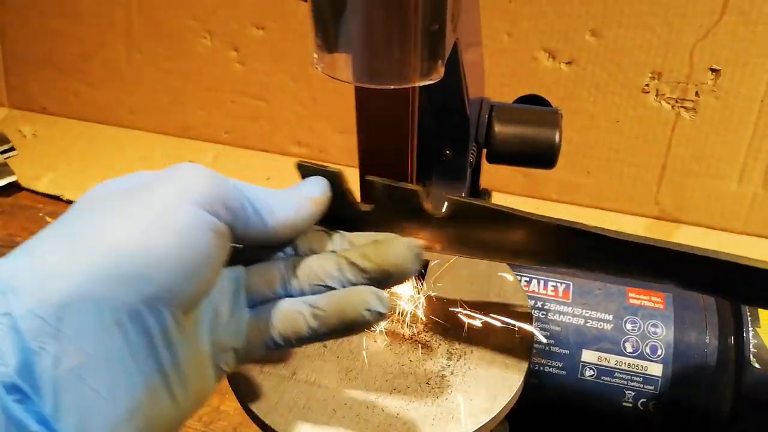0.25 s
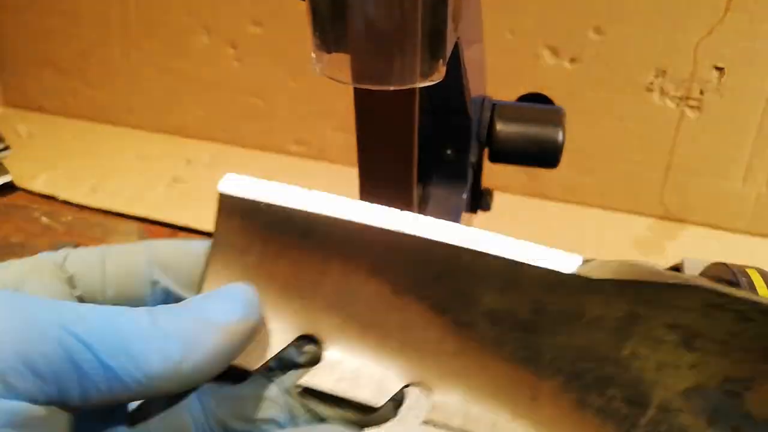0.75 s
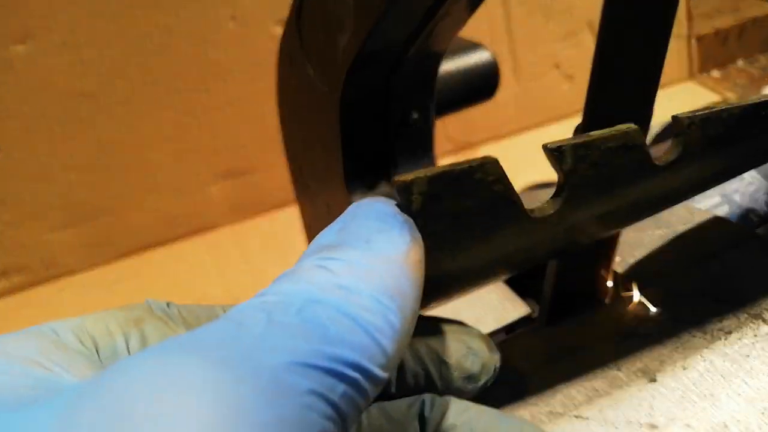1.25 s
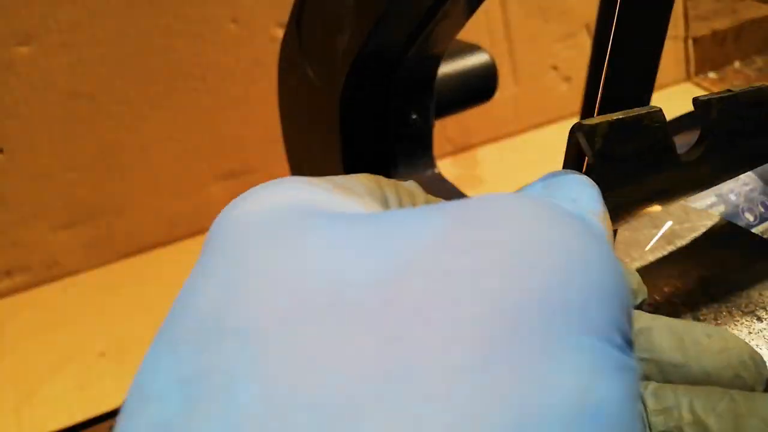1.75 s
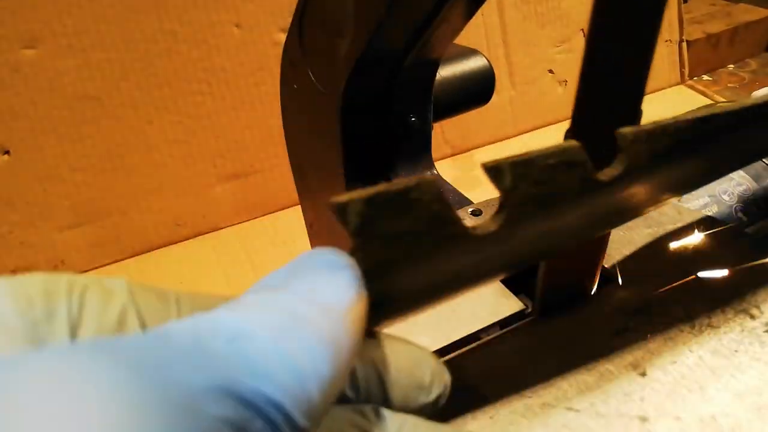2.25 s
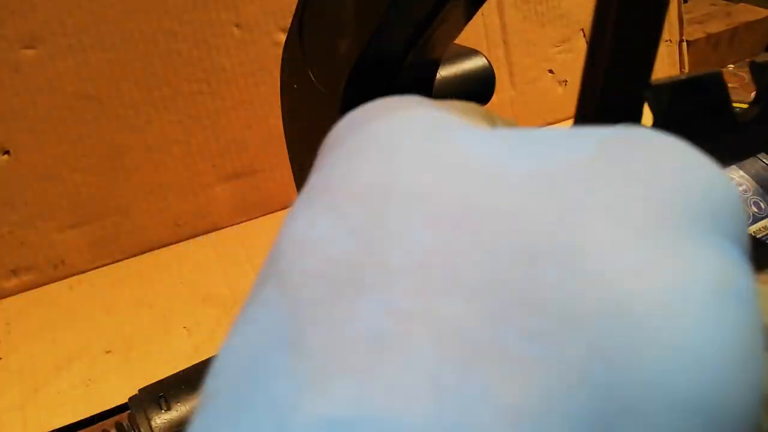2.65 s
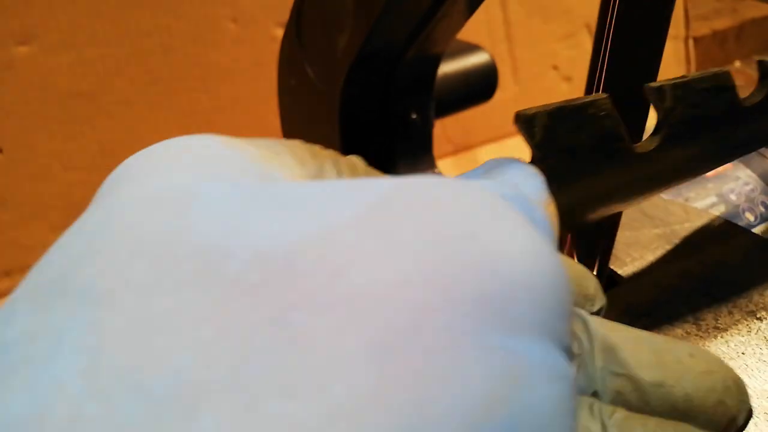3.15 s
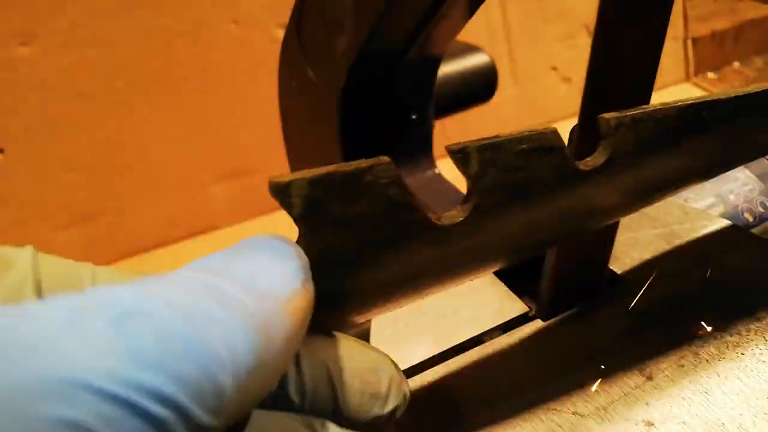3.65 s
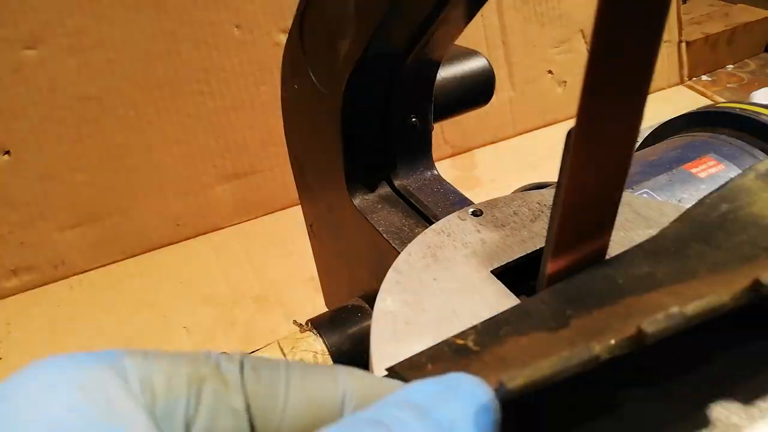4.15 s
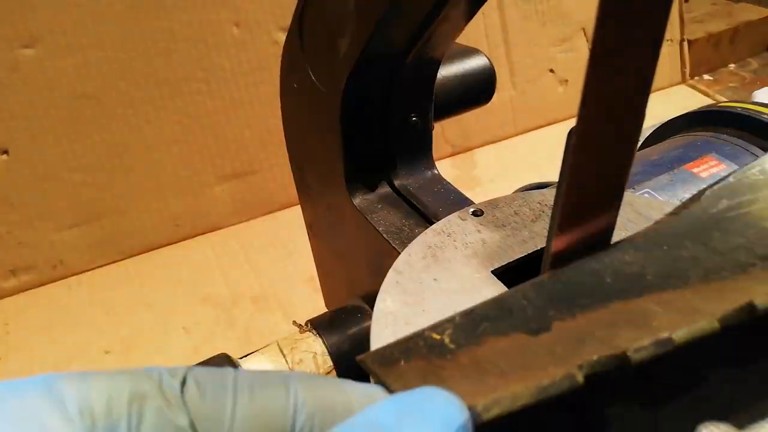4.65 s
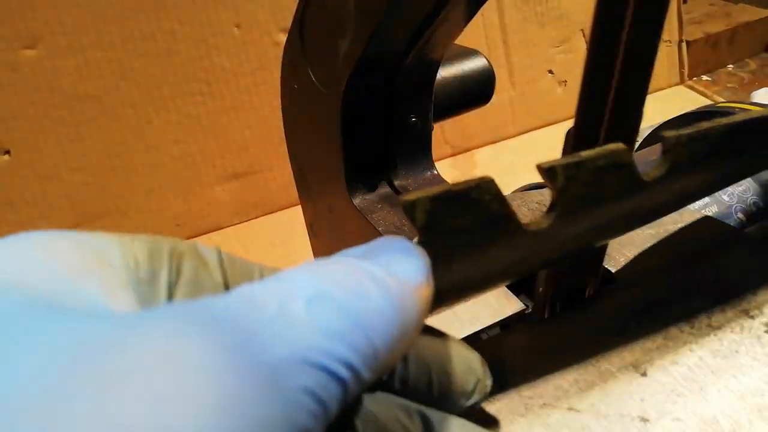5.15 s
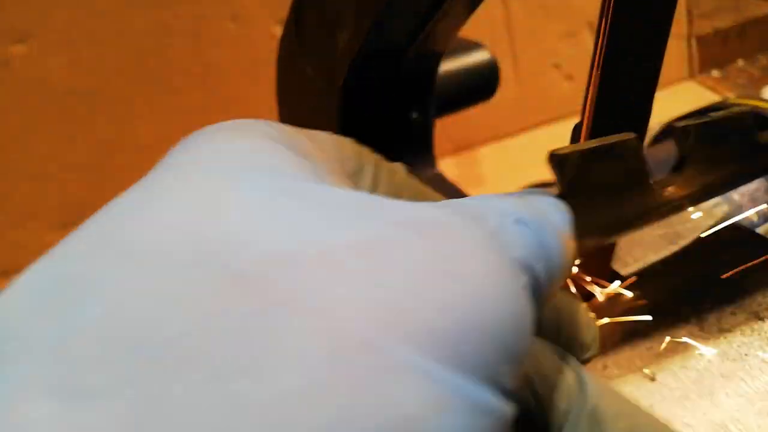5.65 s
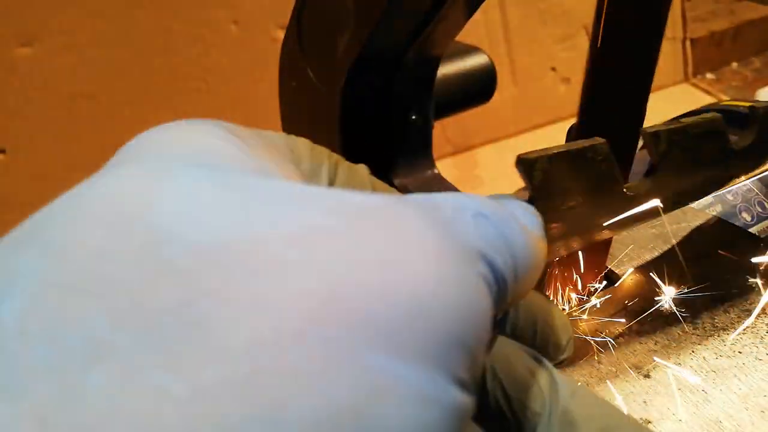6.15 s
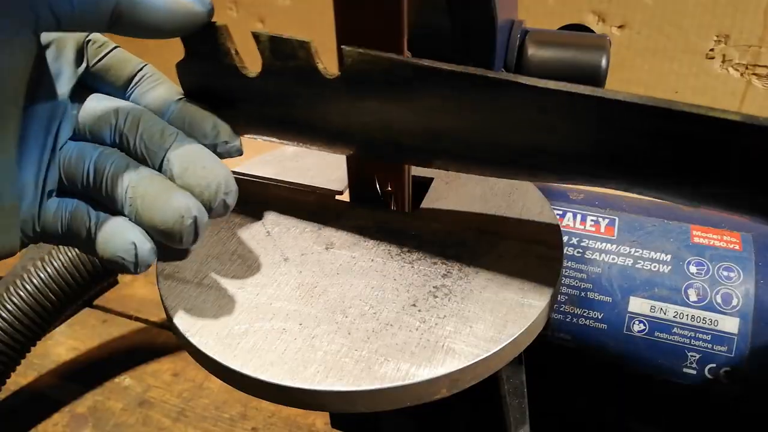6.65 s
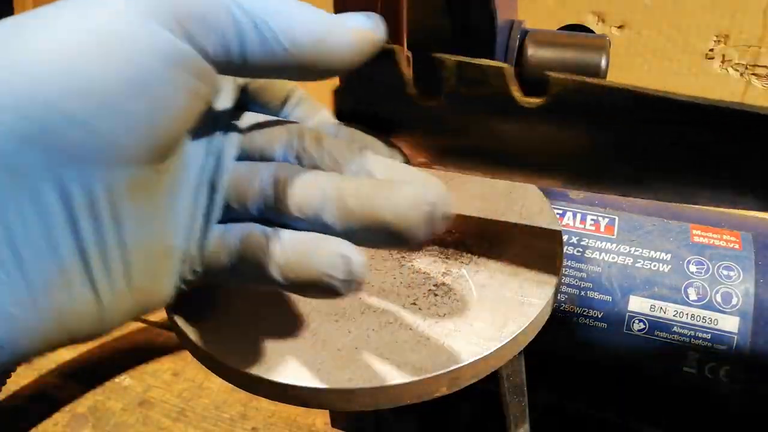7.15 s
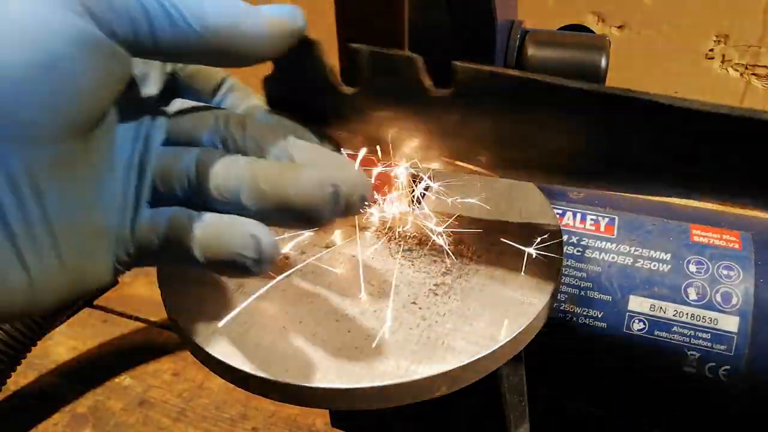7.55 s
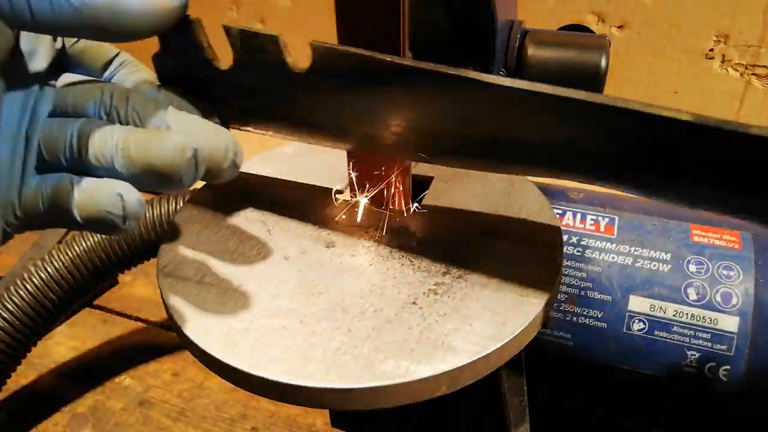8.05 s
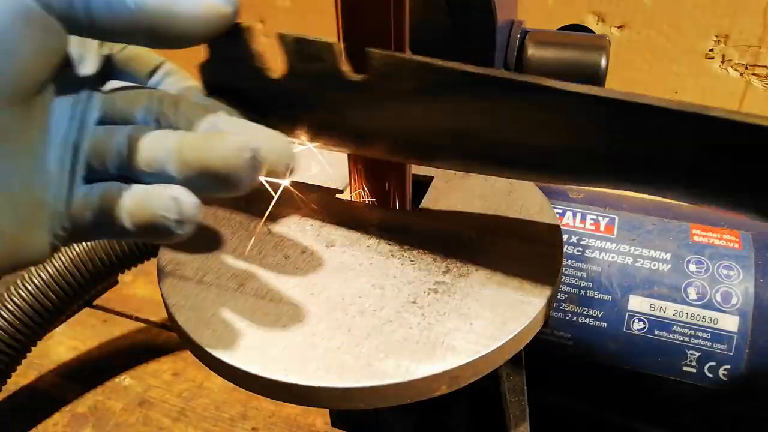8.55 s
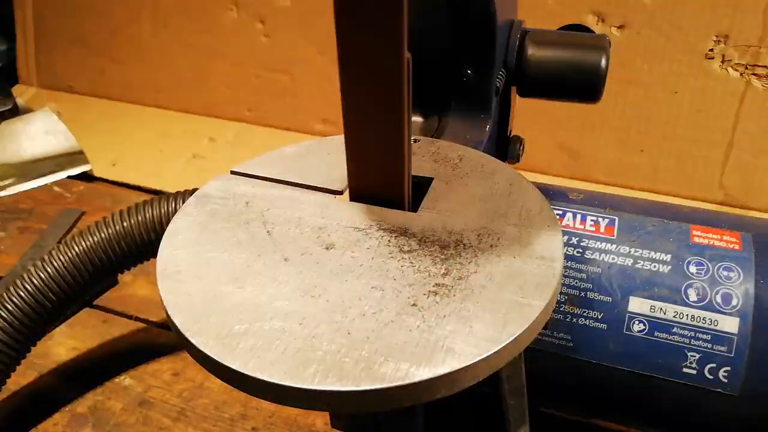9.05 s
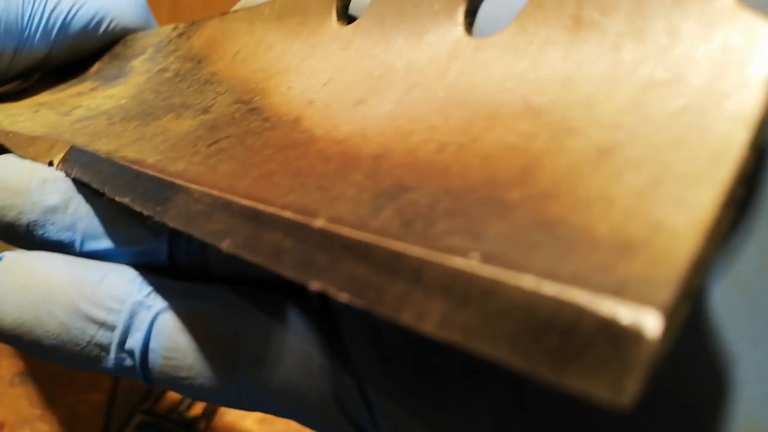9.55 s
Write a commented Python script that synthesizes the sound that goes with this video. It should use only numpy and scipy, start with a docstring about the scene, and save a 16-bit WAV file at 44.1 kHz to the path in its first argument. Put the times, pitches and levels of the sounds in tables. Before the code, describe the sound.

A steel blade scrapes on a running belt sander in harsh, ringing abrasive strokes over a steady motor hum, then everything cuts to quiet.

```python
"""Blade on a belt sander

A steel blade moves to and fro on a narrow belt sander beside a humming dust extractor, heard from front and side.
The grit hisses as shaped noise and drives the blade's ringing modes; both throb some 43 times a second.
Taps, a brief buzz, frame resonances and idle noise surround them; from 9.1 s only the quiet workshop is left.
The recorder's gain control presses the hum down under the grinding."""
import sys
import numpy as np
from scipy import signal
from scipy.io import wavfile
from scipy.ndimage import uniform_filter1d

SR = 44100
rng = np.random.default_rng(int(sys.argv[2]) if len(sys.argv) > 2 else 0)


def inscribe(sig):
    """Save sig as 16-bit PCM at rate SR to the path in sys.argv[1].

    A 1-D sig is mono; a 2-D sig holds one channel per row.
    Samples are clipped to [-1, 1] before scaling.
    """
    pcm = np.round(np.clip(np.atleast_2d(sig).T, -1, 1) * 32767)
    wavfile.write(sys.argv[1], SR, pcm.astype(np.int16))


N = 433062
STEP = 40
COARSE_S = np.arange(N // STEP + 2) * STEP / SR   # slow controls live on every 40th sample
QUIET_FROM_S = 9.112   # the machines stop sounding here
# All levels are those reaching the microphone, before its dip and the recorder's gain control.


def from_db(db):
    """Gain of a level in dB."""
    return 10 ** (np.asarray(db) / 20)


def fine(coarse):
    """A slow control at every sample."""
    return np.interp(np.arange(N) / SR, COARSE_S, coarse)


def at_hz(points, hz):
    """A table of (frequency [Hz], value) read on a log frequency axis."""
    points = np.array(points)
    return np.interp(np.log(hz), np.log(points[:, 0]), points[:, 1])


def drift(rate):
    """Slow chance of spread 1: noise through a double one-pole low-pass at this rate in Hz, run in."""
    r = np.exp(-2 * np.pi * rate * STEP / SR)
    noise = rng.standard_normal(len(COARSE_S) + 2000)
    slow = signal.lfilter([1], [1, -2 * r, r * r], noise)[2000:]
    return slow / slow.std()


def resonate(x, hz, width_hz):
    """Noise of rms 1 through a two-pole resonance comes out with rms about 1."""
    r = np.exp(-np.pi * width_hz / SR)
    gain = np.sqrt((1 - r * r) / 2)
    poles = [1, -2 * r * np.cos(2 * np.pi * hz / SR), r * r]
    return signal.lfilter(gain * np.array([1, 0, -1]), poles, x)


def quarter_ahead(ring, hz):
    """A narrow ring a quarter cycle earlier, from its slope."""
    return np.gradient(ring, axis=-1) / np.sin(2 * np.pi * hz / SR)


# Microphone places in turn: (start [s], seen from the side [0-1], hum [Hz], hum left-right [dB],
# hum left lead [rad], third partial [dB re first], idle noise [dB], full hum shift under grinding [Hz])
PLACES = [(0, 0.01, 331, 0.5, -0.083, -22.5, -1, 3.0), (0.985, 0.53, 329.2, -2.1, -0.64, -36, 0.5, -0.7),
          (6.631, 0.02, 331, -0.05, 0.55, -36, 4.5, 3.0)]
START, SIDE, HUM_HZ, HUM_PAN, HUM_LEAD, THIRD_DB, IDLE_OFFSET, HUM_SHIFT = range(8)


def by_place(column):
    """A column of the microphone places, held until the next place."""
    rows = np.array(PLACES)
    return rows[np.searchsorted(rows[:, START], COARSE_S, "right") - 1, column]


THROB_HZ, IDLE_THROB_DB, GRIND_THROB_DB = 42.996, 2, 1   # mean rate; mean swing either way
TICK_DB, TICK_SHARPNESS = 1.3, 14   # typical extra peak on a crest, and how narrow it is


def throb(depth_db):
    """A quick regular swell in dB, uneven in depth, its crests topped by sharp ticks of chance height."""
    turn = 2 * np.pi * THROB_HZ * COARSE_S + .5 * drift(1.4)
    cycle = np.abs(turn // (2 * np.pi)).astype(int)
    tick_db = TICK_DB * np.minimum(rng.exponential(1, len(turn)), 3)[cycle]
    crest = np.exp(TICK_SHARPNESS * (np.sin(turn) - 1))
    return depth_db * (1 + .4 * drift(8.6)) * np.sin(turn) + tick_db * crest


TOUCH_S, LIFT_S, LIFTED_DB = 0.03, 0.025, -7.5   # landing and leaving time; curve value off the belt
# The blade resting on the belt, one curve for each contact:
# (time [s], grinding pressure [dB over the hum], contact place along the edge [-1 to 2])
CONTACTS = [
    [(0, 15, 0.1), (0.1, 14, 0.05), (0.2, 13, -0.035), (0.29, 17, -0.2), (0.4, 17, 0.05), (0.484, 16, 0.1)],
    [(1.255, 9, -0.052), (1.33, 12, -0.1), (1.63, 16.5, -0.5), (1.9, 12, 1.15), (2.1, 10, -0.054),
     (2.27, 18.5, -0.42), (2.52, 14, -0.42), (2.72, 16.5, 0.82), (3.04, 13.5, -0.75), (3.42, 16.5, 0.43),
     (3.57, 12, -0.56), (3.688, 16.5, -0.52)],
    [(5.14, 10, -0.071), (5.16, 5.5, -0.071), (5.19, 10.5, -0.1), (5.32, 19, -0.16), (5.45, 11, 0.63),
     (5.67, 12, 0.6), (5.86, 18, 0.027), (6.06, 10, -0.46), (6.22, 20, 0.37), (6.37, 18.5, 1.2),
     (6.471, 12.5, 0.84)],
    [(6.655, 14, 0.6), (6.74, 17, 0.11), (6.92, 13, -0.7), (7.2, 12, -0.17), (7.54, 19, -0.0025),
     (7.81, 18, 0.89), (7.9, 13.5, -0.3), (7.98, 18.5, 0.22), (8.07, 15.5, -0.21), (8.25, 20, 0.65),
     (8.34, 15, -1.1), (8.6, 15.5, 0.053), (8.9, 15, -0.1), (8.975, 12, -0.22)],
]


def contact():
    """Pressure (dB) and place: the blade lands, follows its curve and lifts off."""
    rows = []
    for curve in CONTACTS:
        (first_s, _, first_place), (last_s, _, last_place) = curve[0], curve[-1]
        rows.append((first_s - TOUCH_S, LIFTED_DB, first_place))
        rows += curve
        rows.append((last_s + LIFT_S, LIFTED_DB, last_place))
    s, stroke_db, place = np.transpose(rows)
    return np.interp(COARSE_S, s, stroke_db), np.interp(COARSE_S, s, place)


RING_UP_S, RING_LATE_DB, BITE_DB = 0.09, -13, 5.5   # settling time; ringing and grit offsets on landing


def landing():
    """1 as the blade lands, dying away while it settles; the first contact is already settled."""
    land_s = np.array([curve[0][0] - TOUCH_S for curve in CONTACTS[1:]])
    since_s = COARSE_S - land_s[:, None]
    return np.sum((since_s > 0) * np.exp(-np.abs(since_s) / RING_UP_S), axis=0)


# Colour of the grit hiss; only its shape counts: (frequency [Hz], density [dB per Hz])
GRIT_COLOUR = [(300, -45.5), (600, -20.5), (1100, -17.5), (2200, 3), (2600, -7.5), (3400, 1.5),
               (4000, -2.5), (5800, 1.5), (9500, 3.5), (10300, -3), (11300, -6), (11800, -11), (15700, -24)]
GRIT_DB = -5.5   # relative to the grinding pressure


def grit(pressure_db, off_db):
    """Noise layer of the grit scraping steel: it follows the pressure and bites hardest on landing."""
    return GRIT_COLOUR, pressure_db + GRIT_DB + BITE_DB * landing() + off_db, 2.0


BLADE_DB, BLADE_WANDER_DB = -19.5, 2.3   # relative to the pressure; spread of each mode's level
# Pitches of the blade's modes: (frequency [Hz])
MODE_HZ = [1660, 2000, 2210, 2350, 2430, 2960, 3260, 3380, 3440, 3640, 4095, 4390, 4760, 5180, 5470, 6100,
           6430, 7010, 7190, 7600, 7700, 8015, 8260, 8370, 8980, 9280, 9680, 9960, 1350, 11450, 1790]
# One row for each mode: (width [Hz],
# from the front: level [dB at 60 Hz width], left-right [dB], right lead [rad], slope [dB per unit of place],
# from the side: the same four, then at the first microphone place: level [dB], right lead [rad])
MODES = [(90.0, -3.0, -1.0, 0.1, -3.0, -10.0, 0.5, -2.0, -1.0, 2.0, 0.0),
         (90.0, -8.5, -2.5, -3.0, -6.0, 0.5, 1.0, -0.0, -0.5, -8.5, 0.3),
         (53.0, 4.5, 5.0, -1.2, -2.0, 6.5, 2.0, 2.5, -9.0, 3.0, -0.5),
         (90.0, 7.0, 0.5, -2.8, -4.0, -4.5, -9.0, 2.1, -20.5, -4.5, -0.0),
         (50.0, 2.5, 5.5, -3.0, -3.0, -16.0, -7.5, 2.5, -7.5, 10.5, -0.1),
         (151.0, -3.5, -1.0, -0.8, -5.0, -6.0, -8.0, 0.2, -2.5, 0.5, 0.4),
         (87.0, -1.0, -8.0, -0.5, -9.5, -14.0, -3.0, -1.3, -6.0, -13.5, 0.2),
         (72.0, 7.5, -7.5, -0.6, -2.0, -3.0, -0.5, -1.6, -3.0, 6.5, 0.1),
         (40.0, 2.0, -4.5, -0.2, -1.5, 3.5, 0.5, -1.4, -2.0, 11.0, 0.2),
         (61.0, -4.5, -5.0, -2.8, -1.0, -2.0, -8.0, -0.4, -4.0, -7.0, -0.5),
         (50.0, -0.5, -4.0, 2.8, -2.0, 3.5, 0.5, -0.1, -1.5, -4.0, -1.6),
         (60.0, 2.5, -4.0, -1.9, 1.0, -0.5, -1.5, -2.4, -3.0, 2.0, -3.0),
         (70.0, 3.0, -6.0, 0.1, -2.0, 4.5, 3.5, -0.7, 0.5, 2.5, -1.1),
         (40.0, -1.0, -3.0, -1.7, -1.5, -3.0, 3.5, -1.5, 2.0, -6.5, -2.9),
         (56.0, -1.5, -2.0, 1.3, 1.0, 0.0, 3.0, -1.4, -2.5, -12.5, -1.2),
         (44.0, 7.0, -6.5, -2.1, 3.0, -8.0, -4.0, 3.1, -3.0, 6.5, 0.2),
         (44.0, 2.5, -5.5, 1.8, 2.5, -0.5, 4.5, -2.9, -1.0, -11.5, 3.0),
         (46.0, -1.5, -3.0, 2.8, 1.5, 10.0, -12.5, -1.0, 8.5, 3.5, 0.7),
         (48.0, 2.0, -2.0, 1.7, 3.5, -7.5, -6.0, -1.6, 9.0, 11.0, 0.6),
         (49.0, -4.0, -5.5, 2.7, -0.5, 2.5, -9.5, -2.2, 9.0, -1.0, -0.6),
         (90.0, -0.5, -6.5, 2.8, 5.0, -4.5, -5.5, -1.5, -3.5, 7.0, 2.1),
         (31.0, 6.5, -5.0, -0.5, 3.0, 6.0, -6.0, -2.5, 4.0, 7.5, -0.3),
         (48.0, 4.5, -4.0, -0.6, 3.0, 2.0, -3.0, 3.1, -2.5, 10.5, -2.8),
         (35.0, 2.0, -1.5, -0.5, 3.0, 2.0, -7.0, -1.3, -3.0, 2.5, -3.0),
         (80.0, 6.0, 1.5, -0.4, -0.5, 4.0, 3.5, 3.1, 1.0, 8.0, -3.1),
         (50.0, -1.0, 8.5, -0.5, -2.0, 1.0, -0.5, -0.1, 5.5, 2.5, -1.1),
         (140.0, 0.5, 7.0, 0.5, 8.0, -0.5, 4.0, 3.0, 2.0, -1.5, -1.4),
         (38.0, 2.5, 6.0, -0.5, 3.0, -0.5, 3.0, -2.3, 0.0, -0.5, 1.6),
         (200.0, -12, -1.0, 0.1, 0.3, -11, -2.5, 0.3, -0.3, -20, 0.1),
         (70.0, -9.5, 3.5, -1.3, 0.3, -8.5, 2.0, 0.4, 0.3, -1.0, -1.4),
         (90.0, -3.5, -1.5, -0.3, -1.5, -9.0, 0.7, 0.3, -1.5, -9.0, 0.1)]
# How alike the ringing is at left and right: (frequency [Hz], common share [0-1])
BLADE_LIKENESS = [(1500, 0.98), (4000, 0.8), (10000, 0.6)]


def blade(pressure_db, place, side):
    """Grit noise drives every mode; the contact place favours some modes and mutes others."""
    out, drive = np.zeros((2, N)), rng.standard_normal((2, N))
    first_place = COARSE_S < PLACES[1][START]
    for hz, (width_hz, *seen) in zip(MODE_HZ, MODES):
        level_db, pan_db, lead, slope_db = np.where(side > .5, np.c_[seen[4:8]], np.c_[seen[:4]])
        level_db = np.where(first_place, seen[8], level_db)
        lead = np.where(first_place, seen[9], lead)
        level_db = level_db + BLADE_DB + pressure_db + 10 * np.log10(width_hz / 60)
        level_db += slope_db * place + BLADE_WANDER_DB * drift(9) + flares(hz)
        common, apart = stray(resonate(drive, hz, width_hz), hz)
        alike = np.clip(at_hz(BLADE_LIKENESS, hz), 0, 1)
        left, right = from_db(level_db + pan_db / 2), from_db(level_db - pan_db / 2)
        turned = fine(right * np.cos(lead)) * common + fine(right * np.sin(lead)) * quarter_ahead(common, hz)
        out[0] += fine(left) * common
        out[1] += alike * turned + np.sqrt(1 - alike ** 2) * fine(right) * apart
    return out


# A mode sings out for a moment as the edge passes over the belt:
# (time [s], nearest mode [Hz], rise [dB], length [s], the bell's spread being 0.6 of it)
FLARES = [(1.44, 8370.0, 11.0, 0.08), (2.35, 6430.0, 11.0, 0.09), (2.35, 8370.0, 11.0, 0.11),
          (2.43, 2210.0, 8.0, 0.18), (2.96, 8370.0, 9.0, 0.13), (3.0, 6430.0, 10.0, 0.1),
          (3.04, 2350.0, 7.0, 0.19), (3.38, 8015.0, 11.0, 0.13), (5.24, 3640.0, 12.0, 0.07),
          (5.9, 6430.0, 12.0, 0.13), (6.11, 2210.0, 7.0, 0.25), (6.42, 8980.0, 9.0, 0.07),
          (7.09, 8260.0, 10.0, 0.11), (7.67, 6430.0, 10.0, 0.13), (7.76, 8260.0, 12.0, 0.21),
          (8.22, 8980.0, 7.0, 0.14), (8.46, 8260.0, 10.0, 0.1), (8.7, 1790.0, 5.0, 0.2)]


def flares(hz):
    """The short bell-shaped swells of one mode, in dB."""
    s, flare_hz, rise_db, length_s = np.transpose(FLARES)[:, :, None]
    nearest_hz = np.array(MODE_HZ)[np.argmin(np.abs(flare_hz - MODE_HZ), axis=1)]
    swells_db = rise_db * np.exp(-.5 * ((COARSE_S - s) / (.6 * length_s)) ** 2)
    return np.sum(swells_db[nearest_hz == hz], axis=0)


BLADE_STRAY = 0.0012   # spread of each mode's pitch, as a share, as the grip and the contact change


def stray(ring, hz):
    """A narrow ring whose pitch wanders a little, by turning its phase."""
    turn = 2 * np.pi * np.cumsum(BLADE_STRAY * hz * drift(5)) * STEP / SR
    return fine(np.cos(turn)) * ring + fine(np.sin(turn)) * quarter_ahead(ring, hz)


HUM_DB, HUM_SECOND_DB = -26.5, -41   # mean hum level; second partial relative to the first
HUM_WAVER_HZ, HUM_FLUTTER_DB = 0.6, 1.2   # spread of pitch and of level
GRIND_FUZZ, FUZZ_FROM_DB = 0.055, 4.5   # roughness per dB of pressure above that level


def extractor(stroke_db):
    """The fan motor sings at its shaft rate with two weak partials; the hum turns fuzzy under the grinding."""
    fuzz = np.clip(GRIND_FUZZ * (stroke_db - FUZZ_FROM_DB), 0, 1.2)
    shift_hz = by_place(HUM_SHIFT) * np.clip(fuzz, 0, .5) * 2
    hum_hz = by_place(HUM_HZ) + shift_hz + HUM_WAVER_HZ * drift(4)
    turn = 2 * np.pi * np.cumsum(fine(hum_hz)) / SR + fine(fuzz * drift(17))
    flutter = from_db(HUM_DB + HUM_FLUTTER_DB * drift(8.3))
    level = np.sqrt(2) * fine(flutter * (1 + 0.29 * fuzz * drift(30)))
    lead, pan = fine(by_place(HUM_LEAD)), fine(from_db(by_place(HUM_PAN) / 2))
    third_db = uniform_filter1d(by_place(THIRD_DB), round(.25 * SR / STEP), origin=round(.1 * SR / STEP))
    upper = from_db(HUM_SECOND_DB) * np.sin(2 * turn) + fine(from_db(third_db)) * np.sin(3 * turn)
    return level * (np.array([pan * np.sin(turn + lead), np.sin(turn) / pan]) + upper)


# Resonances of the running machine, before the throb:
# (frequency [Hz], width [Hz], level from the front [dB over the hum], from the side [dB over the hum])
FRAME = [(67.2, 9, -16.5, -15), (199, 40, -26.5, -20), (550, 60, -34, -22), (906, 90, -26, -18),
         (1258, 44, -32, -19), (1977, 25, -30, -25), (7910, 400, -22, -8.5)]


def frame(side, throb_db):
    """Frame, table and bearings ring with the running belt, the high resonances throbbing most."""
    out, shake = np.zeros((2, N)), rng.standard_normal((2, N))
    for hz, width_hz, front_db, side_db in FRAME:
        mid, apart = resonate(shake, hz, width_hz)
        alike = np.clip(at_hz(LIKENESS, hz), 0, 1)
        level_db = HUM_DB + np.where(side > .5, side_db, front_db) + throb_db * min(hz / 2000, 1)
        out += fine(from_db(level_db)) * np.array([mid, alike * mid + np.sqrt(1 - alike ** 2) * apart])
    return out


TAP_WIDTH, TAP_CRACK = 0.47, 0.6   # width as a share of pitch; share of wide crack from 6 kHz up, less below
# The blade taps the table: (time [s], peak level [dB], pitch [Hz], 60 dB decay of the blow [s])
TAPS = [(1.1378, -9, 5840, 0.02), (3.784, -19.5, 1700, 0.023), (4.197, -19, 1260, 0.019),
        (6.626, -23, 353, 0.03)]


def taps():
    """Short noisy knocks of steel on the table: decaying noise through a broad resonance."""
    out = np.zeros(N)
    for s, peak_db, hz, t60 in TAPS:
        t = np.arange(round(t60 * SR)) / SR
        burst = rng.standard_normal(len(t)) * from_db(-60 * t / t60)
        tick = resonate(burst, hz, TAP_WIDTH * hz) + TAP_CRACK * burst * min(hz / 6000, 1)
        start = round(s * SR)
        out[start:start + len(t)] += from_db(peak_db) * tick / np.abs(tick).max()
    return out


BUZZ_HZ, BUZZ_WIDTH_HZ, BUZZ_THROB_DB = 3743, 70, 4.5
# A loose part buzzes for a while: (time [s], level before throb and left-right lean [dB])
BUZZ = [(3.72, -46), (3.83, -41), (4.02, -37), (4.2, -40), (4.6, -50), (5.1, -41)]


def buzz():
    """One narrow noise-driven ring leaning left, swelling at the throb rate."""
    s, level_db = np.transpose(BUZZ)
    level_db = np.interp(COARSE_S, s, level_db, left=-200, right=-200) + throb(BUZZ_THROB_DB)
    ring = resonate(rng.standard_normal(N), BUZZ_HZ, BUZZ_WIDTH_HZ)
    return fine(from_db(level_db)) * ring * from_db([[2.5], [-2.5]])


IDLE_FRONT_DB, IDLE_SIDE_DB = -7.5, -2.5   # over the hum, before throb and each place's offset
BLEND_S = 0.068   # one microphone place dissolves into the next
# Colour of the idle noise heard from the front: (frequency [Hz], density [dB per Hz])
IDLE_FRONT = [(25, -19.5), (70, -25.5), (150, -32), (250, -27.5), (450, -31), (970, -34.5), (1600, -35),
              (4160, -38), (9000, -31), (10200, -32.5), (11000, -47.5), (15700, -58)]
# Colour of the idle noise heard from the side: (frequency [Hz], density [dB per Hz])
IDLE_SIDE = [(25, -18), (70, -21.5), (150, -26.5), (300, -29), (480, -28), (800, -28.5), (2500, -33),
             (3000, -27), (6000, -28.5), (10000, -27), (11000, -41), (15700, -51)]


def idle(side, idle_throb_db, off_db):
    """Two noise layers of the running machines, mixed by power as the microphone place turns."""
    blend = uniform_filter1d(side, round(BLEND_S * SR / STEP)) + 1e-9
    idle_db = HUM_DB + by_place(IDLE_OFFSET) + idle_throb_db + off_db
    front_db = idle_db + IDLE_FRONT_DB + 10 * np.log10(np.abs(1 - blend))
    side_db = idle_db + IDLE_SIDE_DB + 10 * np.log10(np.abs(blend))
    return [(IDLE_FRONT, front_db, 1.0), (IDLE_SIDE, side_db, 1.8)]


QUIET_DB = -64   # before its patchy wander
# Colour of the quiet workshop: (frequency [Hz], density [dB per Hz])
QUIET = [(15, -31), (25, -2), (91, -5.5), (210, -14), (568, -27), (1310, -21), (8160, -25.5), (13600, -34),
         (15600, -25.5)]


def workshop():
    """Noise layer of the quiet room, always present under the machines."""
    return QUIET, np.full(len(COARSE_S), QUIET_DB), 1.0


# How alike left and right are: (frequency [Hz], likeness [0-1])
LIKENESS = [(60, 0.99), (150, 1), (380, 0.48), (950, 0.38), (2380, 0.21), (5980, 0.14)]
# Stereo lean of the noise: (frequency [Hz], left-right [dB])
LEAN = [(60, -0.5), (130, 1), (290, -2.5), (640, 7), (1410, -1.5), (3100, -3), (6820, 0), (15000, 5.5)]


def hiss(layers):
    """Bands of stereo noise; each layer (colour, dB curve, patchy dB) adds its power to every band."""
    out = np.zeros((2, N))
    edges = np.r_[np.geomspace(25, 2000, 14), np.geomspace(2350, 16000, 15)]
    centres = np.sqrt(edges[1:] * edges[:-1])
    shares = [from_db(at_hz(colour, centres)) ** 2 * np.diff(edges) for colour, _, _ in layers]
    white = rng.standard_normal((2, 2, N))      # neighbouring bands get unrelated noise
    for k, hz in enumerate(centres):
        band = signal.butter(2, edges[k:k + 2], "band", fs=SR, output="sos")
        to_unit = np.sqrt(SR / 2 / (edges[k + 1] - edges[k]))
        mid, apart = signal.sosfilt(band, white[k % 2]) * to_unit
        patch = 0.76 * drift(4) + 1.2 * drift(30)
        power = 0
        for share, (_, level_db, patchy_db) in zip(shares, layers):
            power = power + share[k] / share.sum() * from_db(level_db + patchy_db * patch) ** 2
        alike, lean = np.clip(at_hz(LIKENESS, hz), -1, 1), from_db(at_hz(LEAN, hz) / 2)
        pair = np.sqrt(1 + alike) * mid + np.sqrt(1 - alike) * apart * [[1], [-1]]
        out += fine(np.sqrt(power / 2)) * pair * [[lean], [1 / lean]]
    return out


CHATTER_DB = 1.5   # spread of the quick uneven grinding level


def scene():
    """Machines and grinding until they cut off, then the quiet workshop."""
    stroke_db, place = contact()
    side, running = by_place(SIDE), COARSE_S < QUIET_FROM_S
    lifted_db = 2 * np.minimum(stroke_db, 0)      # off the belt the grinding drops further
    pressure_db = HUM_DB + stroke_db + lifted_db + throb(GRIND_THROB_DB) + CHATTER_DB * drift(25)
    idle_throb_db, off_db = throb(IDLE_THROB_DB), np.where(running, 0, -200)
    steel = blade(pressure_db + RING_LATE_DB * landing(), place, side) + taps()
    machines = extractor(stroke_db) + frame(side, idle_throb_db) + buzz()
    noise = hiss([grit(pressure_db, off_db), *idle(side, idle_throb_db, off_db), workshop()])
    return noise + fine(running) * (steel + machines)


DIP_HZ, DIP_WIDTH_HZ, DIP_SHARE = 2590, 220, 0.4   # a narrow dip in the microphone's colour
KNEE_DB, SQUEEZE = -24, 0.8   # threshold, and dB taken off per dB over it
SENSE_S, RELEASE_DB_S = 0.002524, 301.5   # smoothing time; fall of the held over-level
CUTOFF_HZ = 15650


def record(dry):
    """Microphone dip, then gain control that bites in a few ms and lets go steadily, then a steep top cut."""
    dry = dry - DIP_SHARE * signal.lfilter(*signal.iirpeak(DIP_HZ, DIP_HZ / DIP_WIDTH_HZ, SR), dry)
    r = np.exp(-1 / (SENSE_S * SR))
    smoother = [1 - r], [1, -r]
    power = np.mean(dry ** 2, axis=0)
    sensed = signal.lfilter(*smoother, power, zi=[power[:SR // 20].mean()])[0]
    level_db = 10 * np.log10(sensed + 1e-12)
    # hold each peak over the knee and let it fall at the release rate
    fall = RELEASE_DB_S * np.arange(N) / SR
    over_db = np.maximum.accumulate(np.maximum(level_db - KNEE_DB, 0) + fall) - fall
    cut_db = SQUEEZE * signal.lfilter(*smoother, over_db, zi=over_db[:1])[0]
    wet = dry * from_db(-cut_db)
    return signal.sosfilt(signal.ellip(12, .5, 70, CUTOFF_HZ, fs=SR, output="sos"), wet)


dry = scene()
out = record(dry)
inscribe(out)
```